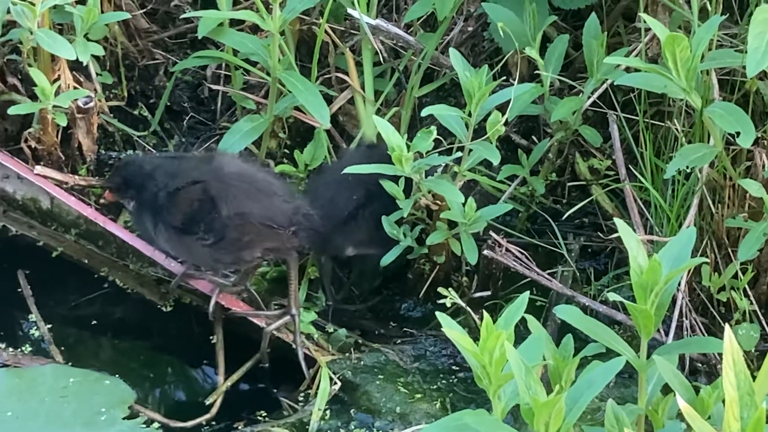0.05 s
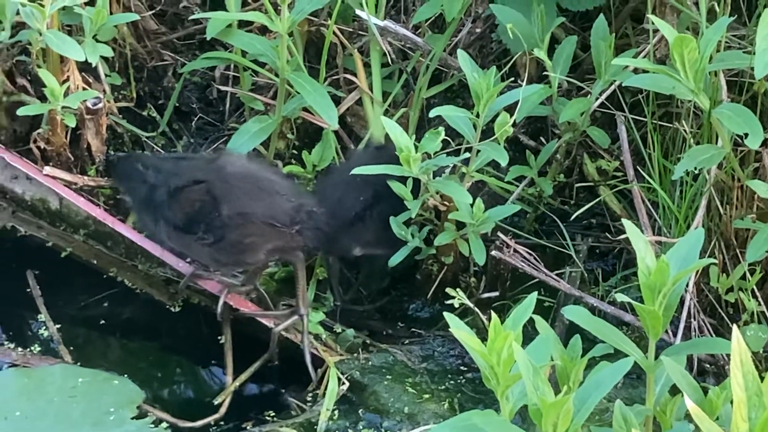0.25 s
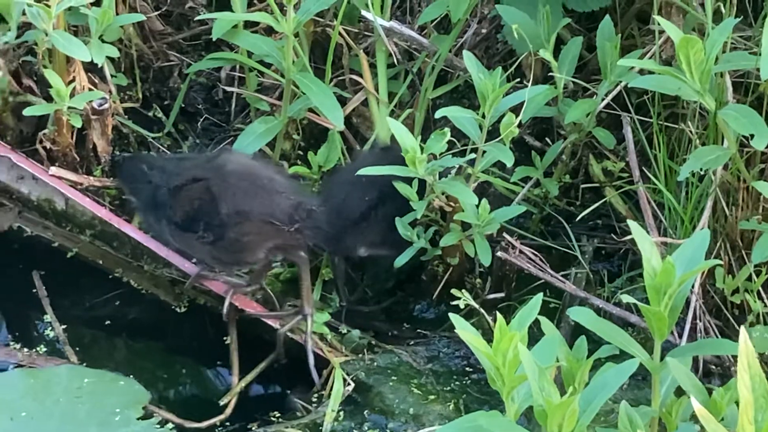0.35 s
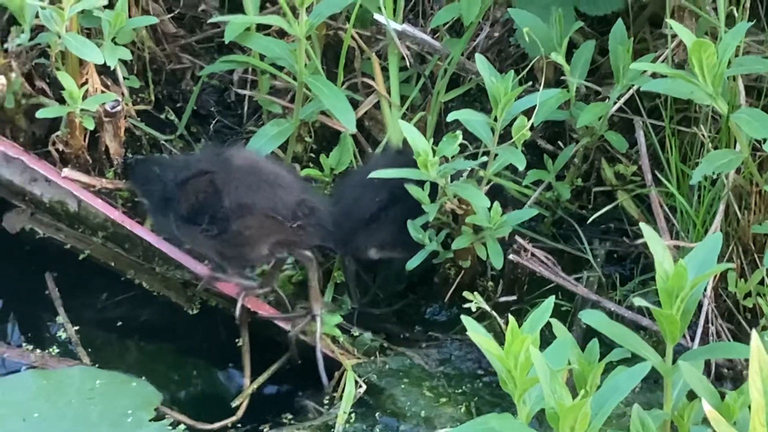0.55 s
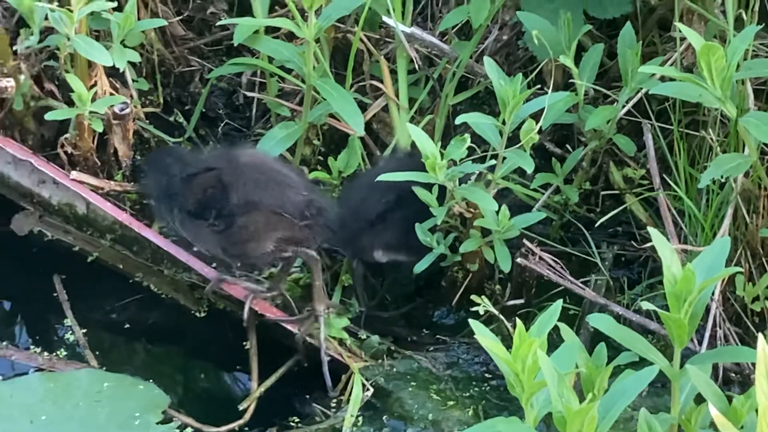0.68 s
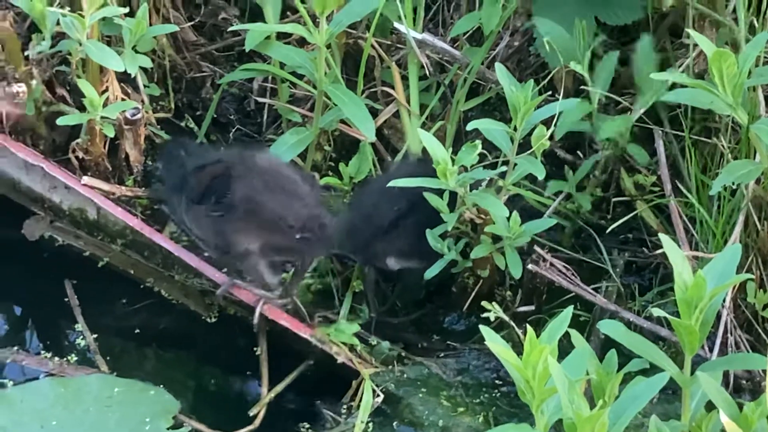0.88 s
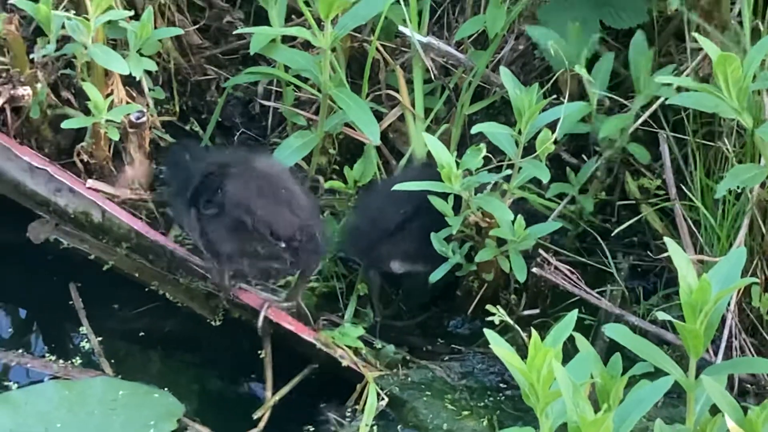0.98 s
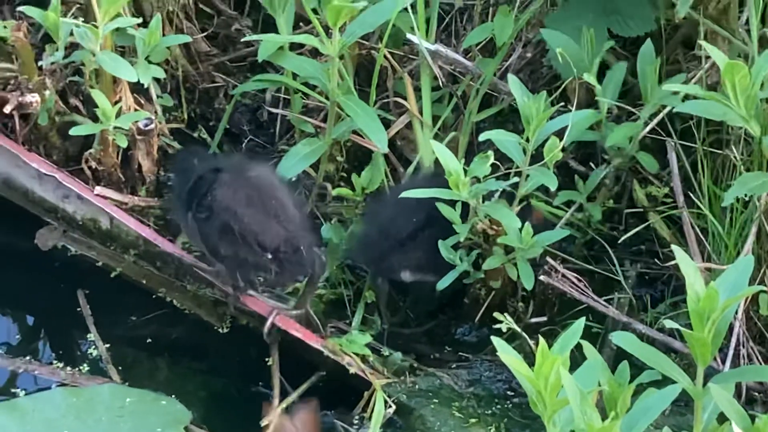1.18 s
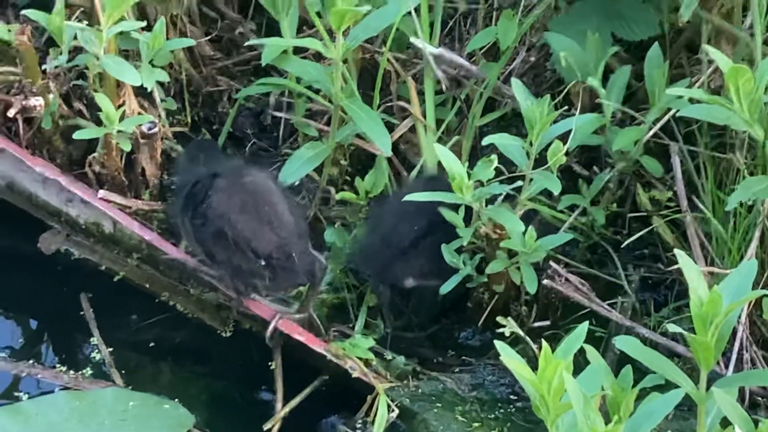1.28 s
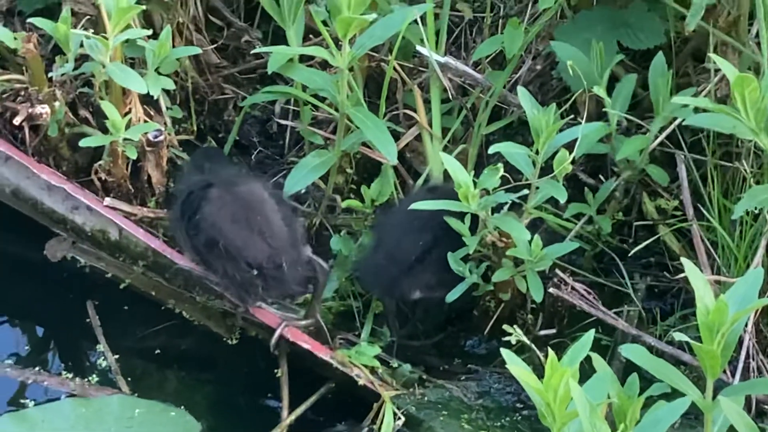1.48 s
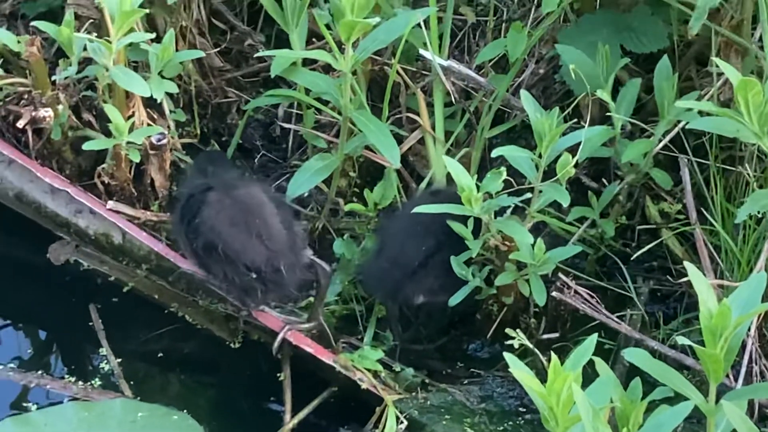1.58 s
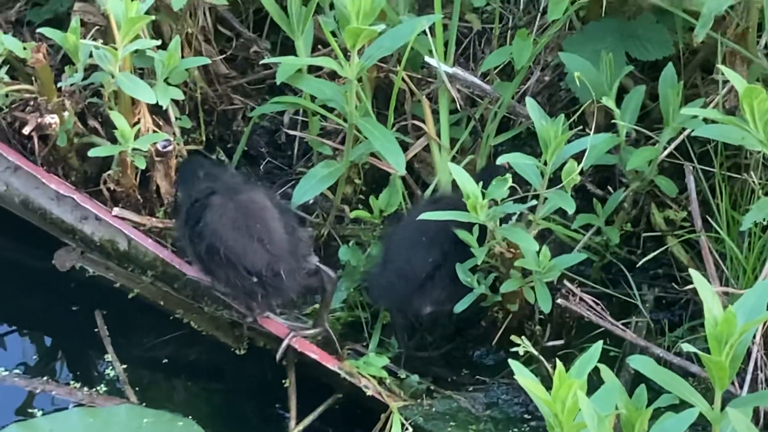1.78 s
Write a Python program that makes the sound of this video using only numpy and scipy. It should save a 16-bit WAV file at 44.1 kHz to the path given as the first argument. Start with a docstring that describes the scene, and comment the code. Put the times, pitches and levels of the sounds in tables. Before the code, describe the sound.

One sharp moorhen chick cluck cuts through brief foliage rustling, with soft distant coos and rumble

```python
"""A low distant rumble swells under open air while soft wavering sine notes coo far off, dove-like.
Filtered noise makes a long leafy rustle from the start; a stem squeaks and leaves brush and tick.
A moorhen chick then clucks once at the planted water's edge: a harmonic grunt breaks into a squeak
that leaps upward with a noisy rasp, and delays and decaying noise echo it off banks and plants.
The rustle thins out, a second stem squeaks, and scattered brushes and ticks carry on with the coos."""
import sys
import numpy as np
from scipy import signal
from scipy.fft import rfft, irfft, next_fast_len
from scipy.io import wavfile

SR = 44100
rng = np.random.default_rng(int(sys.argv[2]) if len(sys.argv) > 2 else 0)


def wav_out(sig):
    """Save sig, one row per channel (or a flat mono array), as 16-bit PCM at SR to the path in sys.argv[1]."""
    wavfile.write(sys.argv[1], SR, np.round(np.clip(np.atleast_2d(sig).T, -1, 1) * 32767).astype(np.int16))


N = 81585
TIME = np.arange(N) / SR
CUTOFF_HZ = 15900
RUSTLE_PAN_DB = 0.5  # left over right, shared by the rustle and the rubbing stems


def from_db(db):
    """Decibels to gain."""
    return 10 ** (np.asarray(db) / 20)


def rms_one(x):
    """Scale to unit rms."""
    return x / np.sqrt(np.mean(x ** 2) + 1e-20)


def in_time(rows):
    """Interpolate each column of a timed curve at every sample."""
    s, *columns = np.transpose(rows)
    return [np.interp(TIME, s, c) for c in columns]


def at_hz(points, hz):
    """Read a spectrum on a log-frequency axis."""
    f, value = np.transpose(points)
    return np.interp(np.log(hz + 1e-9), np.log(f), value)


def pan(db):
    """Left and right gains for a level difference; positive is louder on the left."""
    return from_db(np.array([[db], [-db]]) / 2)


def band(x, edges_hz):
    """Second-order Butterworth band-pass design."""
    return signal.sosfilt(signal.butter(2, edges_hz, "band", fs=SR, output="sos"), x + 1e-18)


def drift(rate_hz):
    """Smoothed random movement with unit rms."""
    hz = np.fft.rfftfreq(N, 1 / SR)
    spectrum = rfft(rng.standard_normal(N)) / (1 + (hz / rate_hz) ** 2)
    return rms_one(irfft(spectrum, N))


def noise(colour, likeness):
    """Coloured stereo noise of unit rms; likeness sets the left-right correlation by frequency."""
    size = next_fast_len(N)
    hz = np.fft.rfftfreq(size, 1 / SR)
    mid, side = rfft(rng.standard_normal((2, size)))
    alike = np.clip(at_hz(likeness, hz), -1, 1)
    # below the first colour point the spectrum rolls away
    gain = from_db(at_hz(colour, hz)) * np.minimum(hz / colour[0][0], 1) ** 2
    stereo = np.sqrt(1 + alike) * mid + np.sqrt(1 - alike) * side * [[1], [-1]]
    return rms_one(irfft(gain * stereo, size)[:, :N])


def background():
    """Low-coloured noise swells as a distant rumble; steady broad noise is the open air."""
    # rumble swells: start_s, level_db
    rumble = [(0, -65), (.12, -59), (.42, -63.5), (.53, -65.5), (.61, -60.5), (.76, -66.5), (.88, -62.5),
              (1.0, -52), (1.11, -63.5), (1.23, -56), (1.31, -63), (1.46, -55.5), (1.56, -60.5),
              (1.7, -58.5), (1.85, -58.5)]
    # rumble spectrum: frequency_hz, relative_level_db
    rumble_colour = [(20, -32.5), (35, -11.5), (50, -4.5), (66, 2), (80, 2), (96, -4.5), (115, -5),
                     (150, -14.5), (220, -26), (400, -59.5)]
    # open-air spectrum: frequency_hz, relative_level_db
    air = [(100, 4.5), (200, -7), (320, -3), (480, 7), (620, -6), (900, -11.5), (1500, -16.5),
           (3000, -26.5), (7000, -30.5), (11500, -33.5), (14000, -39), (16000, -37)]
    # stereo width: frequency_hz, left_right_correlation
    likeness = [(60, 0.93), (250, 0.77), (700, 0.22), (3000, 0.418), (11000, 0.31)]
    air_db = -68
    swelling = from_db(in_time(rumble)[0]) * noise(rumble_colour, likeness)
    return swelling + from_db(air_db) * noise(air, likeness)


def coos():
    """Soft, nearly pure notes that sag a little and waver with distance."""
    # far notes: start_s, length_s, middle_pitch_hz, level_db
    notes = [(0, .1, 460, -74.5), (0.337, 0.2, 507.3, -62.5), (0.557, 0.092, 478, -71.5),
             (0.786, 0.12, 502.4, -73), (.95, 0.13, 373.3, -71.5), (1.331, .22, 490.2, -68),
             (1.615, 0.14, 486.6, -65), (1.73, 0.061, 495, -87)]
    edge_s, sag_hz_per_s, waver_fraction = 0.055, 30, 0.019
    out, waver = 0, 1 + waver_fraction * drift(42)
    for s, length, hz, db in notes:
        pitch = hz * waver - sag_hz_per_s * (TIME - s - length / 2)
        # start and end lie at the middle of each fade
        shape = np.clip(np.minimum(TIME - s, s + length - TIME) / edge_s + .5, 0, 1)
        tone = np.sqrt(2) * np.sin(2 * np.pi * np.cumsum(pitch) / SR)
        out = out + from_db(db) * shape * tone
    return out * from_db(1.15 * drift(59))


def rustle():
    """A long slide through foliage: finely grained noise with a bright edge, thinning out to a stop."""
    # body of the slide: start_s, level_db
    slide = [(0, -55), (.09, -57.5), (.135, -49.5), (.17, -53), (.22, -51), (.3, -53), (.38, -58.5),
             (.47, -59), (.6, -61.5), (.625, -61.5), (.645, -75), (.69, -81)]
    # body spectrum: frequency_hz, relative_level_db
    colour = [(200, -29), (650, -27), (920, -3.5), (1300, -18), (1900, -2), (2400, 2), (2950, 1),
              (3450, -13.5), (4400, -12.5), (7000, -12), (8300, -12), (9800, -52), (16000, -47)]
    # stereo width: frequency_hz, left_right_correlation
    likeness = [(300, 0.489), (900, 0.61), (2400, 0.17), (3500, -.2), (7000, -0.079), (12000, .6)]
    # bright edge: start_s, level_db
    treble = [(0, -121), (.06, -104), (.12, -71.5), (.3, -75), (.46, -77.5), (.5, -77), (.58, -83.5),
              (.66, -105), (.69, -100)]
    # edge spectrum: frequency_hz, relative_level_db
    treble_colour = [(7000, -26), (10000, 1.5), (11500, 5), (13500, -14.5), (15200, -6), (16500, -21.5)]
    body = from_db(in_time(slide)[0]) * noise(colour, likeness) * pan(RUSTLE_PAN_DB)
    edge = from_db(in_time(treble)[0]) * noise(treble_colour, likeness)
    grain = from_db(1.22 * drift(195.5))
    return (body + edge) * grain * (TIME < slide[-1][0])


def brushes():
    """Short grainy noises of brushed leaves, each strongest around its own centre frequency."""
    # brushed leaves: peak_s, peak_level_db, attack_s, fall_db_per_s, centre_hz, pan_db
    strokes = [(0.156, -59, 0.018, 450, 7500, -2), (.38, -71.5, 0.023, 280, 12100, 0),
               (0.533, -64.5, 0.014, 257, 7000, -2), (0.625, -65, 0.013, 446, 6280, -2),
               (0.736, -75.5, 0.034, 259.5, 4120, -2.5), (.802, -74.5, 0.017, 303, 5495, -1),
               (.897, -72, 0.0089, 597, 8640, -2.5), (0.934, -76.5, 0.0073, 352, 9600, -1),
               (.965, -69.5, 0.027, 206, 1280, -0.5), (1.068, -77.5, .03, 252.5, 2000, -3),
               (1.226, -74, 0.017, 336.5, 10000, 0), (1.232, -79, 0.014, 348.5, 2417, -1),
               (1.305, -75.5, 0.015, 130, 4955, -4), (1.369, -57, 0.013, 339, 3960, -3),
               (1.40, -72, 0.0047, 300, 4480, -4), (1.489, -76, 0.027, 206.5, 9000, -1.5),
               (1.722, -72, 0.034, 158.5, 2257, -1.5)]
    # common leaf spectrum: frequency_hz, relative_level_db
    leaf_colour = [(300, -3), (1000, 3.5), (2400, 0), (4200, 1), (6000, 0), (8500, -8), (11000, -1),
                   (13500, -13.5), (16000, -9)]
    # stereo width: frequency_hz, left_right_correlation
    likeness = [(500, .5), (2000, .1), (6000, 0.12), (11000, .6)]
    focus_db, width_octaves = 6.5, 0.18
    grain_db = 3.6 * drift(350)
    hz = np.geomspace(leaf_colour[0][0], CUTOFF_HZ, 32)
    out = 0
    for s, db, attack, fall, centre_hz, pan_db in strokes:
        rise = np.clip(1 + (TIME - s) / attack, 0, 1)
        shape = rise * from_db(db + grain_db - fall * np.maximum(TIME - s, 0))
        octaves_off = np.log2(hz / centre_hz)
        focus = focus_db * np.log10(1 + (octaves_off / width_octaves) ** 2)
        colour = np.column_stack([hz, at_hz(leaf_colour, hz) - focus])
        out = out + shape * noise(colour, likeness) * pan(pan_db)
    return out


def ticks():
    """Tiny snaps of stems: noise that starts at once and decays exponentially."""
    # snaps: start_s, peak_level_db
    snaps = [(0.1523, -60.5), (0.161, -67), (0.7996, -61), (0.8956, -64), (0.9283, -58), (1.0755, -72),
             (1.3602, -60.5), (1.4746, -58)]
    # snap spectrum: frequency_hz, relative_level_db
    colour = [(1000, 4), (4000, -24), (8000, 3.5), (11500, -14), (16000, -24)]
    decay_s = .0015
    shape = sum(from_db(db) * (TIME >= s) * np.exp(-abs(TIME - s) / decay_s) for s, db in snaps)
    return shape * noise(colour, [(1000, 0.62), (11000, 0.3)])


def nearby(x):
    """Stems and water close by add very short reflections; the sum is scaled for their added power."""
    # close reflections: left_delay_s, right_delay_s, gain_db
    reflections = [(.0014, .0016, -10.5), (.0033, 0.0025, -8), (.0061, 0.0058, -2)]
    out, power = x, 1
    for left_s, right_s, db in reflections:
        left = np.interp(TIME - left_s, TIME, x[0])
        right = np.interp(TIME - right_s, TIME, x[1])
        out = out + from_db(db) * np.array([left, right])
        power += from_db(db) ** 2
    return out / np.sqrt(power)


def rubs():
    """Brief, rough, falling squeaks of stem on stem: sine glides with randomly shaken pitch."""
    # stem squeaks: middle_s, length_s, start_pitch_hz, end_pitch_hz, level_db
    squeaks = [(0.132, 0.035, 2308, 2188, -51), (0.619, 0.031, 2286, 1767, -61)]
    roughness = 0.0801  # rms fraction of the pitch
    out = 0
    for s, length, start_hz, end_hz, db in squeaks:
        glide = np.interp(TIME, [s - length / 2, s + length / 2], [start_hz, end_hz])
        hz = glide * (1 + roughness * drift(498))
        shape = np.exp(-(2 * (TIME - s) / length) ** 2)
        tone = np.sqrt(2) * np.sin(2 * np.pi * np.cumsum(hz) / SR)
        out = out + from_db(db) * shape * tone
    return out * pan(RUSTLE_PAN_DB)


def voice(rows, colour, overtones_db=0):
    """A vibrating membrane's harmonics, shaped by the throat; also returns its phase."""
    jitter, shimmer_db, release_db_per_s = .008, 1.29, 2501  # jitter is a fraction of the pitch
    hz, db = in_time(rows)[:2]
    hz = hz * (1 + jitter * drift(288.3))
    start_s, end_s = rows[0][0], rows[-1][0]
    phase = 2 * np.pi * np.cumsum(hz * (TIME > start_s)) / SR
    # seconds before the first point or after the last
    outside = np.maximum(start_s - TIME, 0) + np.maximum(TIME - end_s, 0)
    level_db = db + shimmer_db * drift(300) - release_db_per_s * outside
    tone = 0
    for k in range(1, 8):
        gain = from_db(at_hz(colour, k * hz) + overtones_db * (k > 1))
        tone = tone + gain * np.sin(k * phase)
    return np.sqrt(2) * from_db(np.maximum(level_db, -200)) * tone, phase


def lead(x, radians):
    """Spread a sound over both sides with a phase difference between them."""
    turn = np.exp(.5j * at_hz(radians, np.fft.rfftfreq(N, 1 / SR)) * [[1], [-1]])
    return irfft(rfft(x) * turn, N)


def low_cut(x):
    """High-pass the call: a small bird radiates very little below its lowest note."""
    return signal.sosfilt(signal.butter(4, 200, "high", fs=SR, output="sos"), x + 1e-18)


def grunt():
    """The low opening voice: a short run of sagging harmonics."""
    # low notes: start_s, pitch_hz, level_db
    notes = [(.238, 380, -58.5), (.2415, 402.3, -30.5), (.247, 390.8, -29.5), (.252, 365, -31),
             (.256, 362, -27.5), (.261, 318.4, -37), (.266, 312, -43), (.271, 312, -57)]
    # harmonic colour: frequency_hz, gain_db
    colour = [(300, 1), (420, -5), (720, -14), (1150, -25.5), (1550, -10.5), (1950, -15.5), (2400, -31.5),
              (3000, -47)]
    return voice(notes, colour)[0]


def squeak():
    """The high voice leaps upward, its harmonics shaped by throat and bill; also returns its phase."""
    # high notes: start_s, pitch_hz, level_db, overtone_gain_db
    notes = [(.2504, 440, -50.5, 0), (.2519, 449, -32, -0.5), (.2552, 503, -27.5, -0.5),
             (.2582, 537, -21.5, -6), (.2597, 910, -21, -1.5), (.2616, 1024, -17, 4.5),
             (.264, 1107, -12, -8.5), (.268, 1152, -34, 0), (.277, 1159, -22.5, -10.5),
             (.283, 1117, -27.5, 1), (.289, 1087, -32.5, -10.5), (.302, 1075, -41.5, -21)]
    # throat and bill: frequency_hz, gain_db
    throat = [(350, -30.5), (560, -24), (750, -13), (1050, -11), (1300, -8), (1600, 1), (2050, -7.5),
              (2280, -9.5), (2480, -25), (2900, -50)]
    # the bill points left: frequency_hz, left_lead_radians
    side_lead = [(500, 0), (1100, 1.1), (1500, -0.35), (2100, -0.28), (4000, 0.6)]
    tone, phase = voice(notes, throat, in_time(notes)[2])
    return lead(tone, side_lead) * pan(9), phase


def rasp(phase):
    """A burst of noise at the moment of greatest effort, pulsing with the squeak's vibration."""
    # rasping edge: frequency_hz, relative_level_db
    colour = [(2000, -10.5), (3200, -11.5), (4400, 1), (5300, -10.5), (6200, -12.5), (7300, 0),
              (8400, -19.5), (9500, -21.5), (11200, 12), (13800, -16.5), (15200, 7), (16500, -4.5)]
    peak_s, rise_db_per_s, fall_db_per_s, peak_db = 0.2612, 1800.5, 1804, -34.0
    swell_db = -np.maximum((peak_s - TIME) * rise_db_per_s, (TIME - peak_s) * fall_db_per_s)
    pulsing = 1 + .5 * np.cos(phase)
    return from_db(peak_db + swell_db) * pulsing * noise(colour, [(4000, .2), (10000, .8)])


def cluck():
    """The grunt, the squeak that breaks out of it, and the rasp at its peak."""
    high, phase = squeak()
    return low_cut(grunt() + high + rasp(phase))


def banks(x):
    """A few dull echoes, and a short scatter from the plants whose treble dies first."""
    # bank reflections: delay_s, left_gain_db, right_gain_db, further_right_delay_s
    reflections = [(0.014, -17, -6.5, .0002), (0.028, -9, -13, .0002), (.0395, -21.5, -21, .0002),
                   (0.062, -32.5, -28.5, .0001)]
    # plant scatter: low_hz, high_hz, level_db, t60_s
    scatter = [(230, 700, -17.5, 0.16), (835, 1200, -15.5, .24), (1400, 1600, -25, 0.36),
               (3370, 6900, 9.5, 0.032)]
    mono = x.mean(axis=0)
    dull = band(mono, (620, 1360))
    out = 0
    for delay, left, right, lag in reflections:
        arrival = TIME - delay - np.array([[0], [lag]])
        out = out + from_db([[left], [right]]) * np.interp(arrival, TIME, dull)
    t = TIME[:N // 4]
    for low, high, db, t60 in scatter:
        decay = np.exp(-np.log(1000) * t / t60)
        tail = rms_one(rng.standard_normal((2, len(t))) * decay) / np.sqrt(len(t))
        scattered = signal.fftconvolve(band(mono, (low, high))[None], tail, axes=1)[:, :N]
        out = out + from_db(db) * scattered
    return out


def far_bank(x):
    """One faint, low echo from the far bank: a delayed, band-passed copy in the centre."""
    delay_s, gain_db = .048, -21.5
    low = band(x.mean(axis=0), (230, 380))
    return from_db(gain_db) * np.interp(TIME - delay_s, TIME, low)


def scene():
    """The chick and its surroundings."""
    surroundings = background() + coos() + nearby(rustle() + brushes() + ticks()) + rubs()
    call = cluck()
    return surroundings + call + banks(call) + far_bank(call)


def record(dry):
    """Cut the top steeply with an elliptic low-pass."""
    return signal.sosfilt(signal.ellip(10, .1, 80, CUTOFF_HZ, fs=SR, output="sos"), dry)


dry = scene()
out = record(dry)
wav_out(out)
```